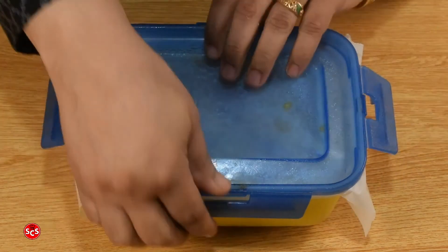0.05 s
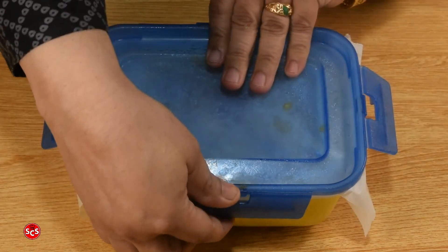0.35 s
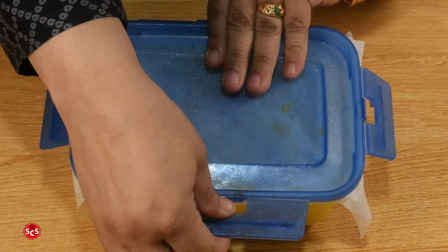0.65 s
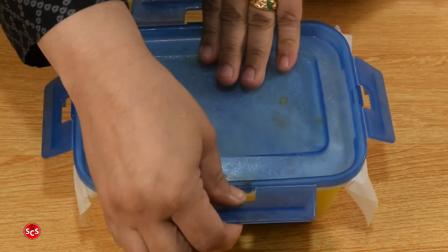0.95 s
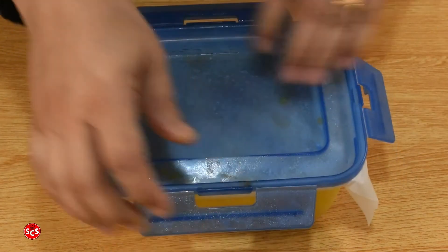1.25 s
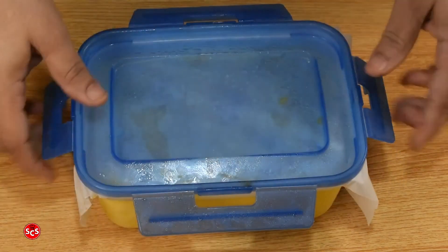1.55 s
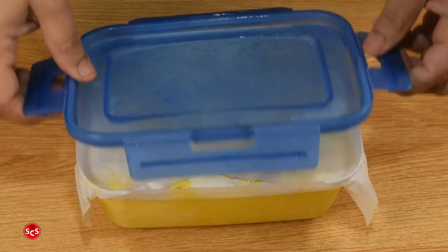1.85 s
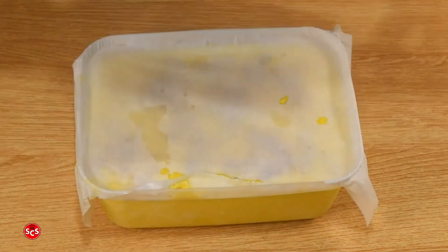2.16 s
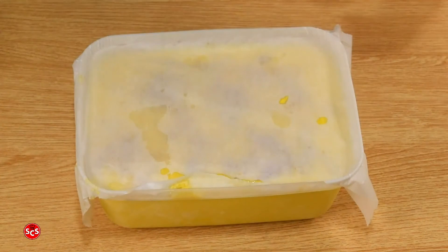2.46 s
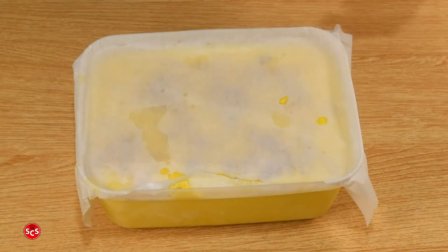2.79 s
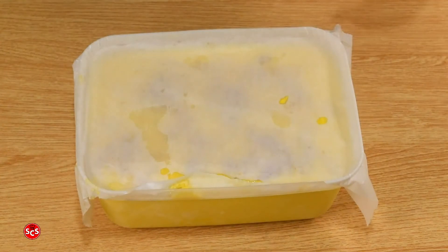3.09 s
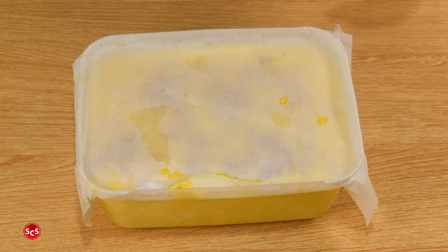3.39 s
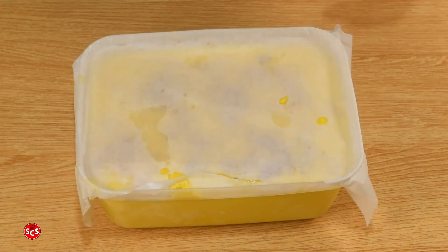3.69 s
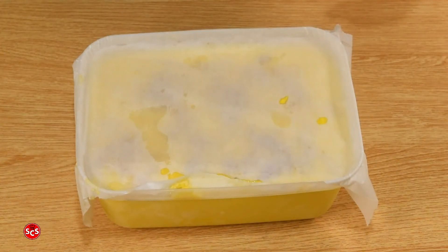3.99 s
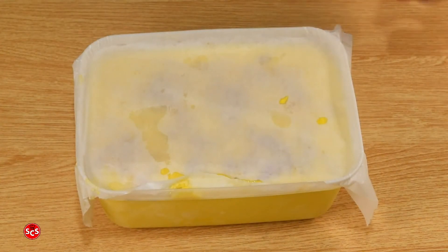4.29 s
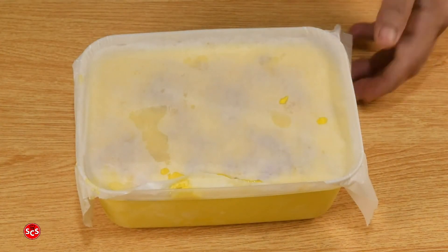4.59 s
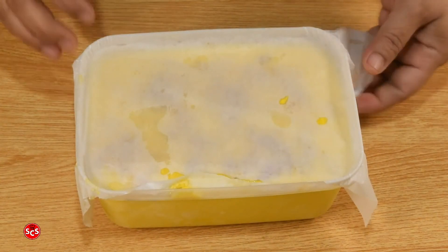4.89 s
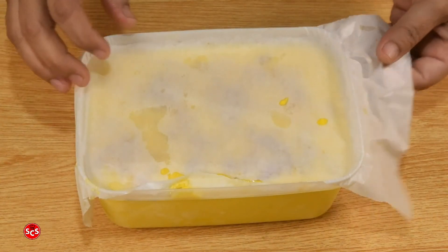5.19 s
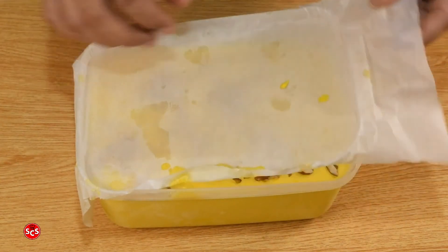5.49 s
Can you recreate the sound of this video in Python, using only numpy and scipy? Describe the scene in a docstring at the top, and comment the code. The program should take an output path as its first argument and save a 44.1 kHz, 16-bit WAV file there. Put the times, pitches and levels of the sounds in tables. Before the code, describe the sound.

A plastic food box unlatches with sharp snaps, its lid clatters onto a wooden table, then baking paper crackles faintly.

```python
"""Opening a plastic food box

On a wooden table in a quiet kitchen, two latches slip free and ring; the second flap slaps the
box, which thumps on the table. The lid is lifted off and laid aside, where it clatters and rocks,
each impact exciting its bending modes. Fingers peel back baking paper, whose creases snap faintly.
Diffuse wall echoes follow the contacts, over room air and the hum of an appliance."""
import sys
import numpy as np
from scipy import signal
from scipy.fft import rfft, irfft, next_fast_len
from scipy.io import wavfile

SR = 44100
rng = np.random.default_rng(int(sys.argv[2]) if len(sys.argv) > 2 else 0)


def unload_audio(sound):
    """Save the sound as a 16-bit wav file, at the path given as the first command line argument."""
    columns = np.transpose(np.atleast_2d(sound))
    # keep every value between -1 and 1, then stretch to whole-number steps
    steps = np.round(np.clip(columns, -1, 1) * 32767)
    wavfile.write(sys.argv[1], SR, steps.astype(np.int16))


N = 249165
TIME = np.arange(N) / SR

# Slips of a latch over the rim. Each row: start in seconds, level in dB, brightness in Hz.
LATCH_SLIPS = [(0.5470, -13.5, 2670), (0.5486, -14, 3030), (0.5505, -12.5, 2800), (0.9152, -6, 4340),
               (0.9168, -3.5, 4900), (0.9183, -19, 12900), (0.9192, -15.5, 5160)]
# Modes of a latch flap. Each row: frequency in Hz, gain in dB, T60 in seconds.
LATCH_MODES = [(374, 20, 0.012), (853, 11, 0.011), (1277, 15, 0.011), (1817, 6, 0.0071),
               (2150, 14.5, 0.0082), (2765, 14, 0.0076), (3280, -0.5, 0.0056), (3900, 12.5, 0.0097),
               (4280, 7, 0.0076), (5300, 1, .008), (7800, 10, 0.001676), (10880, 10, 0.003165),
               (13600, 5, .004)]
# Blows of the flap on the box. Each row: start in seconds, level in dB, brightness in Hz.
FLAP_SLAPS = [(0.9428, -7.5, 8200), (0.9436, -11.5, 7060), (0.9450, -10, 8900)]
# Modes of the box wall. Each row: frequency in Hz, gain in dB, T60 in seconds.
BOX_MODES = [(1100, 15.5, 0.027), (1910, 12, 0.0068), (2570, 1, 0.014), (2640, 16, 0.0047),
             (4450, 10, 0.0032), (6400, 10, 0.00305), (8070, 2.5, 0.0027), (8780, 4.5, 0.0033),
             (12700, 11, 0.0026)]
# Snaps as the room's walls receive them. Each row: start in seconds, level in dB, brightness in Hz.
WALL_SNAPS = [(0.5480, -11, 3670), (0.9170, 1, 4400), (0.9435, -4, 11000)]
# Spectrum of those snaps. Each row: frequency in Hz, gain in dB.
WALL_SNAP_COLOUR = [(100, -12), (250, -1), (550, 9), (850, -5), (1200, 0.5), (1600, -2), (2100, 3.5),
                    (2750, 6), (3600, 3), (4400, 3.5), (5700, -6.5), (8000, -4.5), (11000, -11.5),
                    (16000, -5.5)]
# Impact of the box on the table. Each row: start in seconds, level in dB, brightness in Hz.
BOX_DROP = [(0.9428, -4, 447)]
# Modes of the box on the table. Each row: frequency in Hz, gain in dB, T60 in seconds.
THUMP_MODES = [(144, 19, 0.021), (251.2, 39.6, 0.029), (378, 27, 0.057), (613.7, 39.3, 0.068)]
# Knocks of the lid. Each row: start in seconds, thud and clack levels in dB, brightness in Hz.
LID_KNOCKS = [(2.9541, -1.5, -7.5, 14200), (2.9582, 4, -3, 3630), (3.0400, -6, -7.5, 4020),
              (3.2558, -17, -23, 2570), (3.2900, -15, -8.5, 10500), (3.399, -12, -21, 6000),
              (3.4050, -11, -13, 2860), (3.569, -13.5, -9, 5400), (3.6440, -10, -18.5, 2210),
              (3.6702, -14, -17.5, 3300), (3.8537, -22.5, -21.5, 2900)]
# Runs of rocking. Each row: start in seconds, mean gap in seconds, first thud and clack levels in dB.
LID_ROCKING = [(3.077, .037, -15, -19.5), (3.4713, .027, -14, -23)]
# Low modes of the lid. Each row: frequency in Hz, relative gain in dB, T60 in seconds.
LID_MODES = [(162.6, 21, 0.36), (228, 9, 0.17), (308.5, 28, 0.26), (350, 25.5, 0.17), (412, 17.5, 0.059),
             (485, 6, 0.078), (532.2, 23.5, 0.2), (594.4, 15.5, 0.068), (618, 14.5, 0.052), (741, 13, 0.18),
             (940, 18.5, 0.22), (1021, 18.5, 0.076), (1260, 6, 0.04)]
# Envelope of the lid's crowded upper modes. Each row: frequency in Hz, relative gain in dB.
CLACK_COLOUR = [(90, -44), (200, 14.5), (400, 15), (800, 10), (1200, 11), (1700, 9), (2300, 10),
                (2800, 11.5), (3400, 6.5), (4500, 5), (7500, 3.5), (10000, -4), (16000, -7)]
# Loose flaps striking the fallen lid. Each row: start in seconds, level in dB.
FLAP_CLACKS = [(3.571, -9), (3.6694, -13.5)]
# Fingers and rim on the plastic. Each row: start in seconds, relative level in dB, pitch in Hz.
FINGER_TICKS = [(0.594, -30, 9010), (1.271, -17.5, 2500), (1.274, -20, 7800), (1.312, -12, 550),
                (1.801, -21, 8400), (1.84, -9, 674), (1.875, -10, 4500), (5.125, -12, 516)]
# Snaps of the big creases. Each row: start in seconds, relative level in dB, pitch in Hz.
BIG_CREASES = [(4.929, -12.5, 5500), (4.968, -12, 2400), (4.99, -8.5, 6130), (5.067, -9.5, 6100),
               (5.084, -9, 5300), (5.1095, 1, 9100), (5.1250, 1, 6260), (5.1435, -10, 3960),
               (5.2858, -12, 3660), (5.3262, -17, 4030), (5.3322, -3.5, 5230), (5.449, -10.5, 4130)]
# Spectrum of the paper. Each row: frequency in Hz, gain in dB.
PAPER_COLOUR = [(150, 12.5), (500, 17), (1200, 3), (2400, 1.5), (3300, -2), (4000, -6.5), (4900, -1.5),
                (6000, -8.5), (7500, -5.5), (10000, -13), (13000, -8.5), (16000, -13)]
# Sliding strokes of plastic or paper. Each row: start and length in seconds, relative level in dB.
SLIDES = [(0, 0.66, -67.5), (1.8, 0.19, -62), (1.914, 0.61, -68), (3.817, 0.08, -56), (3.884, 0.097, -61),
          (4.985, 0.19, -58), (5.106, 0.054, -48), (5.411, 0.039, -50.5), (5.478, 0.14, -60)]
# Reverberation time of the kitchen. Each row: frequency in Hz, T60 in seconds.
ROOM_T60 = [(80, .5), (210, 0.71), (560, 0.5045), (1500, 0.6), (3900, 0.47), (10000, 0.8), (16000, 0.6)]
# Spectrum of the reverberation. Each row: frequency in Hz, gain in dB.
ROOM_COLOUR = [(50, -12), (80, -8), (108, 17), (150, 3.5), (250, 0), (500, 4.5), (1000, 8), (3000, -4.5),
               (8000, -5.5), (16000, -5.5)]
# Noise of the room air. Each row: frequency in Hz, relative spectral density in dB.
AIR_COLOUR = [(15, -34), (30, -36), (45, -11), (68, -8.5), (90, -16.5), (135, -3), (190, -14.5),
              (240, -8.5), (400, -11.5), (690, -10.5), (1500, -20.5), (3500, -29.5), (7000, -38.5),
              (15000, -41)]
# Tones of an appliance motor. Each row: frequency in Hz, RMS level in dB.
MOTOR_HUM = [(48.4, -65.5), (102, -76), (237, -73)]


def latches():
    """Stick-slip friction: each latch jerks over the rim and excites the modes of its flap."""
    force = contacts(LATCH_SLIPS, grit_db=0.5, grit_s=0.0024)
    return highpass(ring(force, LATCH_MODES), 220)   # a small flap radiates no bass


def flap_slap():
    """Impact excitation: the freed flap sets the box wall into free vibration."""
    return ring(contacts(FLAP_SLAPS, grit_db=1.5, grit_s=0.0008), BOX_MODES)


def snaps_to_walls():
    """Directivity: the walls receive each snap summed over all directions, with its own spectrum."""
    return colour(contacts(WALL_SNAPS, grit_db=-24.5, grit_s=0.002), WALL_SNAP_COLOUR)


def box_thump():
    """Recoil drops the full box on the table, a soft impact that excites low modes."""
    force = contacts(BOX_DROP, grit_db=-33.5, grit_s=0.0037)
    return highpass(-ring(force, THUMP_MODES), 65)   # the table is too small to radiate deep bass


def lid_touches(loss_db=2, rock_bright_hz=3080, jitter_s=0.0022):
    """Dissipation weakens each touch of a rocking run. Returns knocks and touches, as in LID_KNOCKS."""
    touches = list(LID_KNOCKS)
    for start_s, gap_s, thud_db, clack_db in LID_ROCKING:
        for k in range(3):
            s = start_s + k * (gap_s + jitter_s * rng.standard_normal())
            touches.append((s, thud_db - k * loss_db, clack_db - k * loss_db, rock_bright_hz))
    return touches


def lid_push(touches, base_hz=625, clack_db_per_octave=27, settle_octaves_per_s=0.66):
    """Bending force on the lid: its band lies higher for a sharper contact and falls as the lid settles."""
    push = np.zeros(N)
    landing_s = LID_KNOCKS[0][0]
    for s, thud_db, clack_db, _ in touches:
        blow = from_db(-4) * burst(0.0055)   # a little rattle
        blow[0] += 1
        octaves = (clack_db - thud_db) / clack_db_per_octave - settle_octaves_per_s * (s - landing_s)
        add(push, s, from_db(thud_db) * bandpass(blow, base_hz * 2 ** octaves, ratio=1.69))
    return push


def lid_thuds(touches):
    """Modal radiation: the lid's low modes are heard directly, while the walls get a broad thud."""
    push = lid_push(touches)
    direct = from_db(2) * ring(push, LID_MODES, neighbour_sign=-1)
    to_walls = bandpass(push, 368, ratio=1.58)
    return direct, to_walls


def lid_clacks(touches, crack_s=0.0071, plate_s=0.021):
    """Modal overlap: after the click of an edge, the lid's upper modes merge into decaying noise."""
    strikes = np.zeros(N)
    for s, _, clack_db, bright_hz in touches:
        blow = burst(crack_s) + from_db(-4) * burst(plate_s)
        blow[0] += from_db(-9)   # the click
        add(strikes, s, from_db(clack_db) * lowpass(blow, bright_hz))
    return from_db(-2) * colour(strikes, CLACK_COLOUR)


def flap_clacks(pitch_hz=2750, decay_s=0.0064):
    """Narrow resonance: a loose flap buzzes briefly against the lid at its own pitch."""
    out = np.zeros(N)
    for s, db in FLAP_CLACKS:
        buzz = bandpass(burst(decay_s), pitch_hz, ratio=1.09)
        add(out, s, from_db(db) * unit_energy(bandpass(buzz, pitch_hz, ratio=1.15)))
    return out


def finger_ticks(level_db=-15, decay_s=0.0028):
    """Brief contacts have broad spectra: fingers tick, and the lifting lid brushes the rim."""
    out = np.zeros(N)
    rim_ticks = scattered(start_s=1.8, end_s=2.02, db=-30.5, hz=7600, count=6)
    for s, db, hz in list(FINGER_TICKS) + rim_ticks:
        tick = bandpass(burst(decay_s), hz, ratio=1.22)
        add(out, s, from_db(db + level_db) * unit_energy(bandpass(tick, hz, ratio=3.5)))
    return out


def paper_creases(level_db=-14, decay_s=0.0026):
    """Buckling: each crease of the peeled paper gives way in a snap at its own pitch."""
    snaps = np.zeros(N)
    small_creases = scattered(start_s=4.93, end_s=5.37, db=-23, hz=4700, count=14)
    for s, db, hz in list(BIG_CREASES) + small_creases:
        fibres = burst(decay_s)
        fibres *= rng.exponential(1, len(fibres)) ** 2   # a few give way much harder than the rest
        add(snaps, s, from_db(db + level_db) * unit_energy(bandpass(fibres, hz, ratio=1.49)))
    return snaps


def sliding_rustle(grains_per_s=6000, spread_db=5.5, centre_hz=5500, attack_share=0.21):
    """Sliding friction: tiny impulses of uneven size merge into a rustle that swells with each stroke."""
    sizes = from_db(spread_db * np.minimum(rng.exponential(1, N), 4))
    signs = rng.choice([-1, 1], N)
    grains = sizes * signs * (rng.random(N) < grains_per_s / SR)
    strokes = np.zeros(N)
    for s, length_s, db in SLIDES:
        attack_s = attack_share * length_s
        strokes += from_db(db) * swell(s, length_s, attack_s, length_s - attack_s)
    return unit_rms(bandpass(grains, centre_hz, ratio=2.25)) * strokes


def pull_drone(pitch_hz=109.5, level_db=-60.5):
    """Narrow-band noise is heard as a pitch: a faint rumble swells while the paper is pulled."""
    rumble = bandpass(rng.standard_normal(N), pitch_hz, ratio=1.1)
    rumble = unit_rms(bandpass(rumble, pitch_hz, ratio=1.1))
    return from_db(level_db) * rumble * swell(start_s=5.24, length_s=0.32, attack_s=0.11, release_s=0.11)


def kitchen_echoes(x, first_echo_s=0.0011, build_s=0.002, size=36000):
    """Reverberation: a diffuse field builds after a short gap and decays exponentially in each band."""
    t = TIME[:size]
    spectrum = rfft(rng.standard_normal(size))
    freqs = np.arange(size // 2 + 1) * SR / size
    centres = np.geomspace(60, 16000, 9)
    tail = np.zeros(size)
    for hz, share in zip(centres, np.eye(len(centres))):
        band = irfft(spectrum * at_hz(np.c_[centres, share], freqs))
        tail += band * from_db(-60 * t / at_hz(ROOM_T60, hz))
    tail *= 1 - np.exp(-np.maximum(t - first_echo_s, 0) / build_s)
    return signal.fftconvolve(x, colour(unit_energy(tail), ROOM_COLOUR))[:N]


def air_and_hum(air_db=-59.5, waver_depth=0.023, waver_hz=9.3):
    """Ambient noise: steady room air, and motor tones slightly modulated in amplitude and phase."""
    out = from_db(air_db) * unit_rms(colour(rng.standard_normal(N), AIR_COLOUR))
    for hz, db in MOTOR_HUM:
        waver = waver_depth * unit_rms(lowpass(rng.standard_normal(N), waver_hz))
        out += from_db(db) * np.sqrt(2) * (1 + waver) * np.sin(2 * np.pi * hz * TIME + waver)
    return out


def contacts(rows, grit_db, grit_s):
    """Contact force: an impulse trailed by grit; the softer the contact, the less its treble."""
    force = np.zeros(N)
    for s, db, bright_hz in rows:
        blow = from_db(grit_db) * burst(grit_s)
        blow[0] += 1
        add(force, s, from_db(db) * lowpass(blow, bright_hz, order=3))
    return force


def ring(force, modes, neighbour_sign=1):
    """Superposition of damped modes; alternating signs fill the valleys between their peaks."""
    out = np.zeros(N)
    for k, (hz, db, t60) in enumerate(modes):
        radius = from_db(-60 / (t60 * SR))
        zeros = np.array([1, 0, -1]) * (1 - radius ** 2) / 2
        poles = [1, -2 * radius * np.cos(2 * np.pi * hz / SR), radius ** 2]
        out += neighbour_sign ** k * from_db(db) * signal.lfilter(zeros, poles, force + 1e-18)
    return out


def scattered(start_s, end_s, db, hz, count, spread_db=4.5, spread_octaves=0.4):
    """Contacts of random force and stiffness. Each row: start in seconds, level in dB, pitch in Hz."""
    times = start_s + (end_s - start_s) * (np.arange(count) + rng.random(count)) / count
    deviations = np.clip(rng.standard_normal((count, 2)), -2, 2)
    return [(s, db + spread_db * force, hz * 2 ** (spread_octaves * stiffness))
            for s, (force, stiffness) in zip(times, deviations)]


def burst(decay_s, size=8192):
    """A crowd of tiny contacts, as exponentially decaying noise of unit energy."""
    return unit_energy(rng.standard_normal(size) * np.exp(-TIME[:size] / decay_s))


def swell(start_s, length_s, attack_s, release_s):
    """Envelope with a quarter-sine attack and release."""
    ramp = np.minimum((TIME - start_s) / attack_s, (start_s + length_s - TIME) / release_s)
    return np.sin(np.pi / 2 * np.clip(ramp, 0, 1))


def colour(x, points):
    """Minimum-phase filter: folding the cepstrum makes the given spectrum causal."""
    size = next_fast_len(2 * len(x), real=True) // 2 * 2
    freqs = np.arange(size // 2 + 1) * SR / size
    cepstrum = irfft(np.log(from_db(at_hz(points, freqs))))
    cepstrum[1:size // 2] *= 2
    cepstrum[size // 2 + 1:] = 0
    return irfft(rfft(x, size) * np.exp(rfft(cepstrum)))[:len(x)]


def lowpass(x, hz, order=2):
    """Attenuation above a cutoff."""
    return signal.sosfilt(signal.butter(order, min(hz, 0.45 * SR), fs=SR, output="sos"), x)


def highpass(x, hz):
    """Attenuation below a cutoff."""
    return signal.sosfilt(signal.butter(2, hz, "high", fs=SR, output="sos"), x)


def bandpass(x, hz, ratio):
    """A resonant band reaching a given frequency ratio to either side of its centre."""
    edges = [hz / ratio, min(hz * ratio, 0.45 * SR)]
    return signal.sosfilt(signal.butter(1, edges, "band", fs=SR, output="sos"), x)


def at_hz(points, hz):
    """Interpolation of a table on a log-frequency axis."""
    freqs, values = np.transpose(points)
    return np.interp(np.log(np.maximum(hz, 1)), np.log(freqs), values)


def add(track, s, sound):
    """Superposition of a sound on a track, starting at s seconds."""
    start = round(s * SR)
    track[start:start + len(sound)] += sound[:max(N - start, 0)]


def from_db(db):
    """Decibels to amplitude ratio."""
    return 10 ** (np.asarray(db) / 20)


def unit_energy(x):
    """Normalisation to the energy of a unit impulse."""
    return x / np.sqrt(np.sum(x ** 2) + 1e-20)


def unit_rms(x):
    """Normalisation to unit mean power."""
    return unit_energy(x) * np.sqrt(len(x))


def scene():
    """Direct and reverberant fields add: the box is close; the lid, farther off, stirs more of the room."""
    touches = lid_touches()
    thump = box_thump()
    clacks = lid_clacks(touches)
    crackle = colour(paper_creases() + sliding_rustle(), PAPER_COLOUR)
    handling = crackle + finger_ticks() + flap_clacks()
    thuds, thuds_to_walls = lid_thuds(touches)
    to_walls = (snaps_to_walls() + from_db(-14) * thump + from_db(9) * thuds_to_walls
                + from_db(-7) * clacks + from_db(-8) * handling)
    direct = latches() + flap_slap() + thump + thuds + clacks + handling
    return (direct + kitchen_echoes(to_walls) + pull_drone() + air_and_hum())[None]


def record(dry, ceiling=0.6, cutoff_hz=16000):
    """Soft saturation rounds the loudest peaks, and a steep low-pass cuts the top."""
    rounded = dry / (1 + (dry / ceiling) ** 4) ** (1 / 4)
    return signal.sosfilt(signal.ellip(10, 0.1, 90, cutoff_hz, fs=SR, output="sos"), rounded)


dry = scene()
out = record(dry)
unload_audio(out)
```